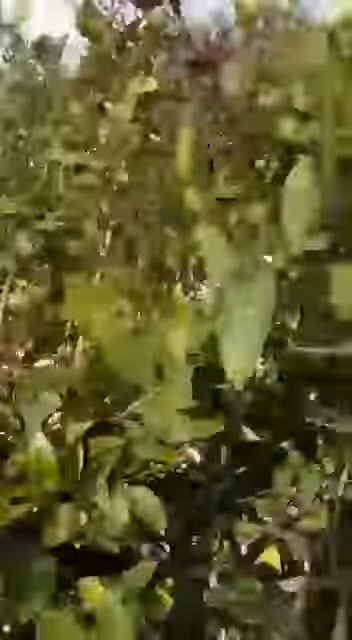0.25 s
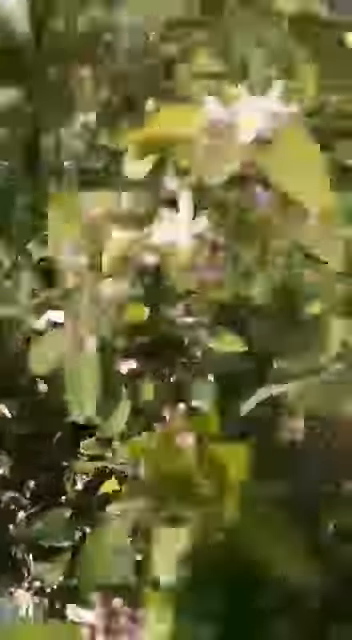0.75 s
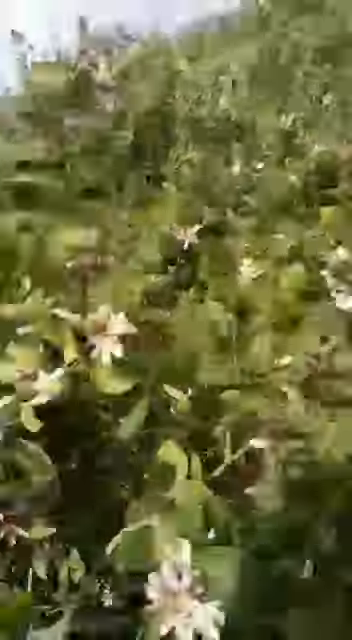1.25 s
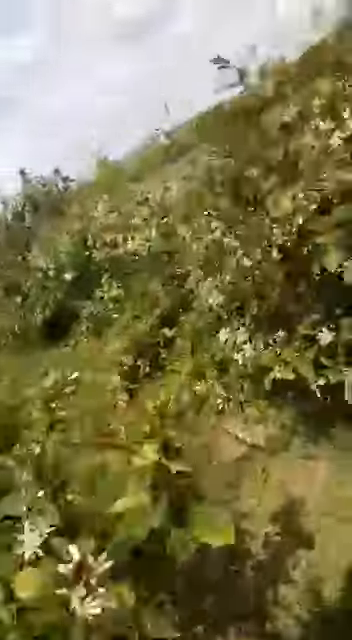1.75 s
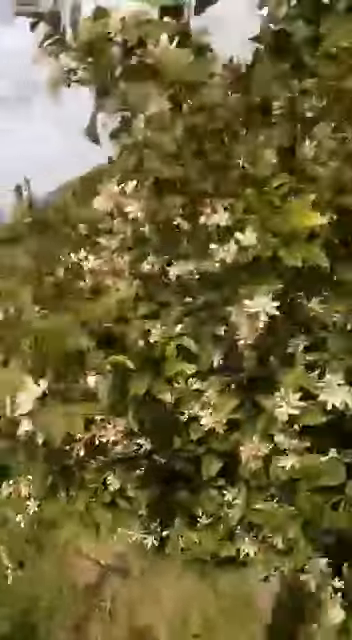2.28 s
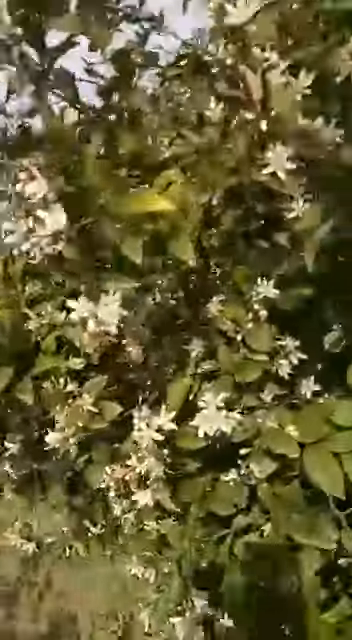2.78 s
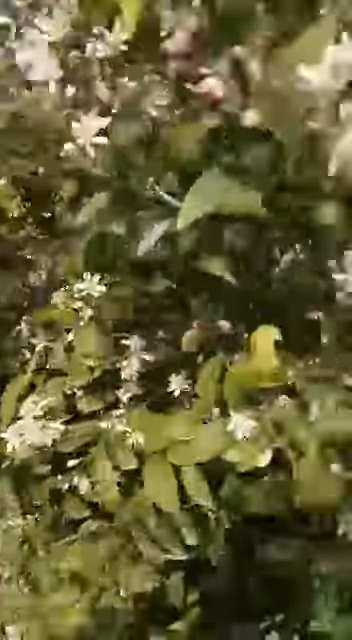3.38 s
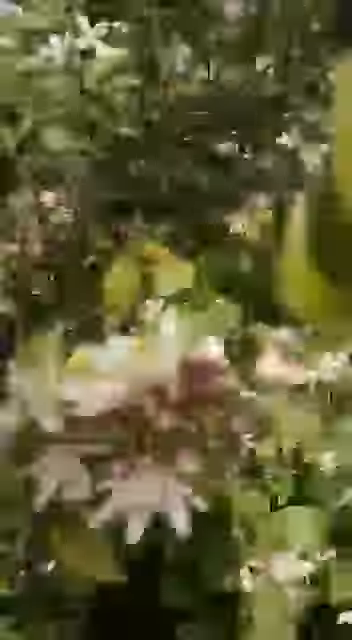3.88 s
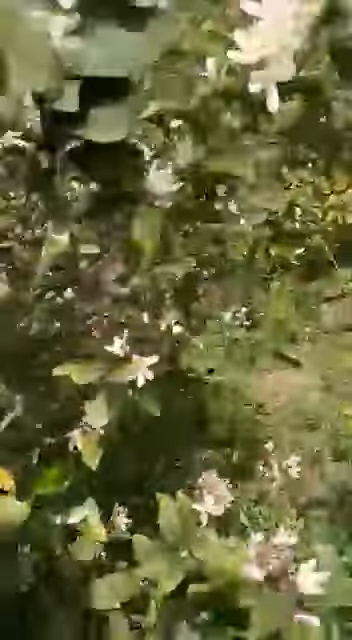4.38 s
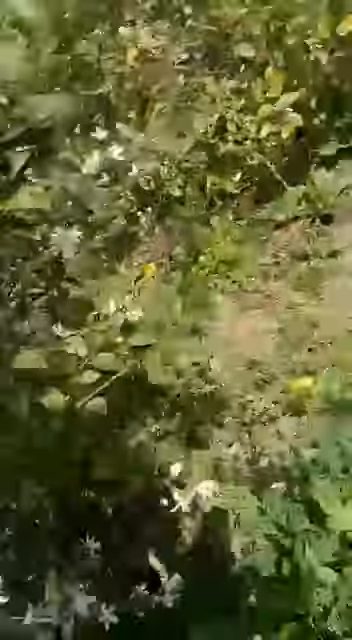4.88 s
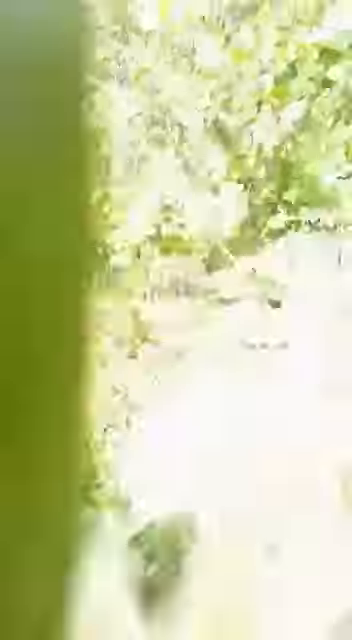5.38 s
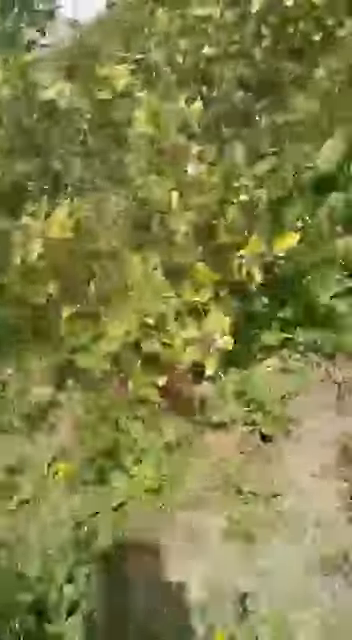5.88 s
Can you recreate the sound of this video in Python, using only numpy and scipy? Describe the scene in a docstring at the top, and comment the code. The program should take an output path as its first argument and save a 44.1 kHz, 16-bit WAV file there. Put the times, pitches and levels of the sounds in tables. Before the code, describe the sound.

Bees buzz faintly in an orchard as leaves rustle softly, until a leafy branch scrapes and knocks loudly against the microphone.

```python
"""A phone is carried through a blossoming orchard. From the start leaves crackle and swish and a swarm
hums with many wing beats, single bees swelling out of it. Wind bumps the microphone ports, one bee
buzzes close by around 1 s, then a far bird chirps. Twigs tick as the walker pushes on; near 2.3 s comes
a thin chirp, probably a bird. At 5 s, the loudest moment, a leafy branch drags across the right port,
sticking and slipping so that the case knocks and rumbles, and lets go with a few scuffs."""
import sys
import numpy as np
from scipy import signal
from scipy.fft import rfft, irfft
from scipy.io import wavfile
from scipy.ndimage import uniform_filter1d

SR = 44100
rng = np.random.default_rng(int(sys.argv[2]) if len(sys.argv) > 2 else 0)


def waveform_to_disk(signal):
    """Save audio, clipped to [-1, 1], as 16-bit WAV at the path in sys.argv[1]."""
    frames = np.transpose(np.atleast_2d(signal))
    scaled = np.clip(frames, -1, 1) * 32767
    samples = np.round(scaled).astype(np.int16)
    wavfile.write(sys.argv[1], SR, samples)


N = 270774
PORT_LAG = 17  # samples between the two ports; every pan is left minus right

# Hard hits of the branch: (time [s], level [dB], pitch [Hz], crack [dB])
SLIPS = [(5.0687, -7, 3160, -9), (5.0703, -15.5, 1170, 3), (5.0778, 1.5, 3630, -25), (5.0813, 1, 2550, -33),
         (5.122, -26.5, 680, -20), (5.1515, -8, 2830, -11), (5.1578, -26, 1210, -22), (5.276, -20, 520, -2),
         (5.2923, -9, 660, -17), (5.299, -11, 990, -11), (5.3145, -3.5, 1480, -24), (5.3202, -11, 664, -26),
         (5.3265, -11, 1670, -9), (5.3435, -6.5, 2170, -3), (5.346, -9, 1200, -28),
         (5.3657, -20, 1090, -19), (5.3722, -8, 746, -32), (5.393, -11.5, 1290, -22),
         (5.406, -13.5, 705, -22), (5.4091, -11.5, 1250, 4), (5.4473, -2.5, 2450, -30),
         (5.477, -1.5, 1460, -45), (5.491, -19, 500, -32), (5.5032, -19, 726, -30),
         (5.5302, -13, 1000, -22), (5.56, -24, 3300, -10), (5.565, -15, 1350, -10), (5.46, -28, 900, -20),
         (5.597, -23, 2670, -11), (5.603, -21, 2290, -20)]
def slips(lets_go_s=5.58):
    """Each slip of the branch knocks and rings the case, hard right until the branch lets go."""
    hits = [(s, db, hz, crack_db, -21 if s < lets_go_s else -3.5) for s, db, hz, crack_db in SLIPS]
    push = snaps(hits, turns=0.24, crack_hz=4540, rise_s=0.00075, fade_s=0.011, grit_db=-34, ring_s=8e-5)
    knock = cut(push, 110, "high", order=2)  # the deepest part of the push leaks away
    return undb(-1.5) * knock + undb(-4.5) * case(knock)


# Friction faders at the nearer port: (time [s], rumble [dB], scratch [dB], crisp top [dB])
DRAG = [(5.0, -69, -66, -66), (5.06, -76, -84, -80), (5.085, -25.5, -44, -70), (5.1, -59, -47, -79),
        (5.135, -50, -41, -60), (5.157, -33, -31, -66), (5.18, -27, -37, -50), (5.195, -37.5, -30, -36),
        (5.21, -53, -42.5, -52), (5.235, -51, -43.5, -58), (5.265, -36, -34.5, -58), (5.28, -35, -31, -74),
        (5.305, -32, -35.5, -71), (5.328, -20.5, -22.5, -41), (5.36, -27.5, -33, -49),
        (5.385, -36, -37.5, -47), (5.41, -30, -39, -42), (5.425, -44, -40.5, -47), (5.44, -44, -38, -59),
        (5.465, -47, -54, -68), (5.485, -35, -44, -75), (5.52, -36.5, -39, -49), (5.545, -32, -37.5, -41),
        (5.57, -42, -40.5, -61), (5.585, -51, -53.5, -50), (5.61, -49, -45.5, -49), (5.68, -57, -58, -55),
        (5.8, -64.5, -66, -60), (6.0, -47, -63, -90)]
# Travel of the branch: (time [s], pan [dB])
DRAG_PAN = [(5.05, 9), (5.09, -13.5), (5.42, -13.5), (5.55, -2), (5.72, 4.5), (6.0, 3)]
# EQ of the scratch: (frequency [Hz], gain [dB])
SCRATCH = [(530, -6), (900, -5), (1500, -0.5), (1740, -4.5), (2030, -2), (3430, -6), (6460, -7),
           (13600, -32), (15000, -13), (16500, -58)]
def drag():
    """Leaves stick and slip on the port: dense jolts scratch it and rumble the case."""
    rumble_db, scratch_db, crisp_db = curves(DRAG)
    pan_db, = curves(DRAG_PAN)

    def rub():
        rumble = unit(case(crackle(340, spread_db=3.5, tail_s=0.0047, hiss=0.3)))
        scratch = colour(crackle(1500, spread_db=2.5, tail_s=0.0006, hiss=0.4), SCRATCH)
        body, top = halves(scratch, 5570)
        flicker = undb(1.8 * walk(70))
        return flicker * (undb(rumble_db) * rumble + undb(scratch_db) * body + undb(crisp_db) * top)
    pair = ports(rub(), pan_db, lag=-PORT_LAG, apart=rub(), alike=0.041)
    return pair * undb(-abs(pan_db) / 2) * gate(DRAG, 0.053)


# Body resonances of the phone: (frequency [Hz], width [Hz], gain [dB])
CASE = [(433, 177, 9.5), (623, 68, 6), (946, 120, 1), (220, 170, -1.5)]
def case(x):
    """The case rings briefly when knocked or rubbed."""
    return resonate(x, CASE)


# Tail of the drag: (time [s], level [dB], pitch [Hz], crack [dB], pan [dB])
SCUFFS = [(5.643, -25.5, 2610, 5, 10), (5.7, -28.5, 2100, -2, 12), (5.73, -25.5, 2950, 4.5, 14),
          (5.749, -30, 2600, 0, 12), (5.91, -31.5, 3420, -8, 7)]
def scuffs():
    """The last leaves brush off the phone in short, gritty strokes."""
    return snaps(SCUFFS, turns=0.056, crack_hz=5460, rise_s=0.0095, fade_s=0.062, grit_db=-13)


# Soft knocks: (time [s], level [dB], pitch [Hz], crack [dB], pan [dB])
TAPS = [(0.6101, -37.5, 560, -22, 2.5), (3.7515, -48.5, 402, -30, 0), (4.3525, -31.5, 628, -25, -0.5),
        (4.856, -44, 476, -10, -1), (4.8637, -36, 524, -6, 3), (5.022, -28.5, 674, 4.5, 4.5)]
def taps():
    """Light touches on the case give short midrange knocks."""
    return snaps(TAPS, turns=0.51, crack_hz=6000, rise_s=0.00071, fade_s=0.029, grit_db=-10)


# Twig and leaf snaps: (time [s], level [dB], pitch [Hz], crack [dB], pan [dB])
TICKS = [(0.611, -44.5, 2070, -20, 12), (0.948, -47, 3200, -15, 14), (1.043, -44, 1490, -20, 9),
         (1.0496, -40, 6530, -21, 9), (1.8019, -48, 5870, 14, 22), (2.3252, -38.5, 1480, -18, 24),
         (2.4472, -46, 6490, 2, 11), (2.8488, -47, 4020, 0, 12), (2.8847, -46, 6050, 17, 12),
         (2.9777, -42.5, 6300, 8, 17), (3.068, -51, 7180, -3, 9), (3.3934, -39, 5000, 10, 11),
         (3.7248, -37.5, 5340, 9, 7), (3.7519, -28, 5070, 11, 9.5), (3.7621, -40.5, 5570, 18, -1),
         (4.2542, -44.5, 6200, 6, 0), (4.7651, -44.5, 6110, -6, 5), (4.8265, -44, 5300, -6, 12),
         (4.8438, -38, 5610, 3, -6), (4.9889, -42, 5500, 17.5, 3.5), (5.3935, -14, 8800, -6, -17),
         (5.42, -28, 7000, 4, -16), (5.5106, -18, 4300, -29, 23), (5.9018, -26.5, 1140, 2, 0.5),
         (5.9049, -31, 5500, 14, 29), (5.9165, -42, 1770, -8, -4)]
# Resonances of the ports: (frequency [Hz], width [Hz], gain [dB])
TICK_RINGS = [(3540, 940, 7), (6100, 1100, 7), (15600, 420, 10)]
def ticks():
    """Twigs and leaves snap, and each sharp click rings in the ports."""
    clicks = snaps(TICKS, turns=0.31, crack_hz=12700, rise_s=0.000089, fade_s=0.014, grit_db=-9.5)
    return clicks + resonate(clicks, TICK_RINGS)


# Foliage faders: (time [s], level [dB], crisp top over body [dB])
RUSTLE = [(0.0, -80.5, -3), (0.18, -79, -4), (0.26, -75.5, 3), (0.45, -69.5, 1.5), (0.6, -68.5, -2),
          (0.68, -73.5, -11), (0.8, -75, -4.5), (1.05, -69.5, -2.5), (1.23, -70.5, 5), (1.44, -77, -9.5),
          (1.56, -74, 2), (2.13, -64.5, -8), (2.3, -71, -5), (2.35, -56.5, -4), (2.42, -65, -2),
          (2.52, -64, 5), (2.64, -66.5, -0.5), (2.75, -62.5, 4), (2.8, -68.5, 1.5), (2.87, -66, -0.5),
          (2.93, -72, -0.5), (3.09, -75, 0), (3.38, -67.5, 2), (3.58, -80, -0.5), (3.76, -66, -1.5),
          (3.87, -75.5, -2), (4.42, -63.5, -3), (4.49, -72, -2.5), (4.84, -61, 1), (5.0, -72.5, 1),
          (5.8, -62, -2), (5.92, -63.5, -2.5), (6.14, -69, -11.5)]
# EQ of the leaves: (frequency [Hz], gain [dB])
LEAF = [(1180, -1.5), (2000, 6.5), (2400, -5.5), (3220, 3.5), (3880, 6.5), (4500, 2), (6470, 1),
        (8140, -15), (10500, -21.5), (13600, -33), (14900, -10), (15700, -20)]
# EQ of a dull swish, with a faint noisy hum at the bees' pitches: (frequency [Hz], gain [dB])
SWISH = [(71, -19), (120, -26.5), (235, -17), (343, -22), (470, -14), (604, -18.5), (820, -10.5), (1230, 1),
         (1390, -5), (1700, -5.5), (2400, -13), (3000, -13.5), (3900, -56), (6600, -120)]
def leaves():
    """Leaves crackle above a duller swish with a faint hum in it; the left port faces them."""
    db, crisp_db = curves(RUSTLE)
    swish_db = -65.5 + 0.33 * (db + 62.5)  # rides a third of the rustle's swells
    air_db = crisp_db - 1.5 + 3.6 * (np.minimum(db, -64) + 61.5)  # only the nearest leaves sparkle

    def rustle():
        grains = colour(crackle(600, spread_db=0, tail_s=0.0018, hiss=1), LEAF)
        body, treble = halves(grains, 8950)
        top, air = halves(treble, 12600)
        sway = undb(0.68 * walk(7.9))
        return sway * (body + undb(crisp_db + 1.5 * walk(30)) * top + undb(air_db + 2.3 * walk(30)) * air)

    def swish():
        grains = colour(crackle(300, spread_db=2.5, tail_s=0.0052, hiss=1.8), SWISH)
        low, upper = halves(grains, 630)
        mid, high = halves(upper, 1515)
        return (undb(3.03 * walk(7.7)) * low + undb(-1.5 + 2.9 * walk(22.03)) * mid
                + undb(-6 + 3.1 * walk(22.1)) * high)
    return (undb(db) * ports(rustle(), pan_db=9.5, apart=rustle(), alike=0.034)
            + undb(swish_db) * ports(swish(), pan_db=4.5, apart=swish(), alike=0.44))


# Fader of the swarm: (time [s], level [dB])
SWARM = [(0.0, -71.5), (0.12, -76), (0.28, -64), (0.54, -72), (0.7, -61.5), (1.02, -63.5), (1.52, -67),
         (2.0, -72), (2.4, -66), (2.9, -70), (3.3, -68), (3.42, -65.5), (3.65, -68), (3.9, -72.5),
         (4.2, -64), (4.45, -63), (4.6, -69), (5.0, -60), (5.3, -68), (6.14, -65)]
# Its pitch drift: (time [s], mean wing beat [Hz])
SWARM_HZ = [(0.0, 230.5), (1.4, 230.8), (2.9, 240), (3.65, 243.4), (3.85, 229), (4.7, 243.3), (5.0, 233)]
# Overtones of each bee: (harmonic [number], level [dB])
SWARM_WING = [(2, 0), (3, -11), (4, -14), (5, -9), (6, -13), (7, -14)]
def swarm(count, detune=0.07):
    """Many bees with evenly spread, wavering wing beats, each swelling at its own pan position."""
    db, = curves(SWARM)
    step = 8  # the hum is deep enough to work out once every few samples
    mean_hz = curves(SWARM_HZ)[0][::step]
    hum = 0
    for place in np.linspace(-1, 1, count):
        hz = mean_hz * (1 + detune * place + .03 * walk(6, step) + .02 * walk(35, step))
        swell = undb(4.5 * walk(10, step) + 4.5 * walk(25, step))
        voice = harmonics(step * hz, [*SWARM_WING, (1, -7.5)]) * swell
        pan_db = 0.52 + 2.6 * rng.standard_normal()
        hum = hum + ports(voice, pan_db, lag=rng.integers(0, PORT_LAG // step + 1))
    hum = hum * undb(3 * walk(12, step))
    return unit(signal.resample_poly(hum, step, 1, axis=1)[:, :N]) * undb(db)


# Close fly-by: (time [s], wing beat [Hz], level [dB], buzz over level [dB])
BEE = [(0.8, 221, -77.5, 10), (0.91, 217.2, -70, 2.5), (0.99, 211.3, -77.5, 10), (1.085, 223, -70.5, 9.5),
       (1.15, 222, -65, 2), (1.2, 215.7, -62, -4.5), (1.262, 210.6, -58, -9.5), (1.31, 223.7, -61.5, -28),
       (1.35, 236, -67, -36), (1.39, 229.2, -66, -27), (1.446, 214, -66, -16), (1.46, 222.4, -86, -2)]
# Its timbre: (harmonic [number], level [dB])
BEE_WING = [(1, 4), (2, -1), (3, -15), (4, -10.5), (5, -2.5), (6, -6.5), (7, -15), (8, -12.5)]
def bee():
    """One bee near the left port: its harmonics flutter, and a sharp flick each beat adds a buzz."""
    hz, db, buzz_db = curves(BEE)
    hz = hz * (1 + .005 * walk(35))
    beats = np.diff(np.floor(np.cumsum(hz) / SR), prepend=0)
    flicks = beats * undb(2 * rng.standard_normal(N))
    buzz = focus(flicks, 3900, 1400)
    tone = 0
    for k, harmonic_db in BEE_WING:
        flutter = undb((1.5 + .1 * k) * walk(40))
        tone = tone + flutter * harmonics(hz * (1 + .002 * walk(60)), [(k, harmonic_db)])
    voice = (np.sqrt(2) * tone + undb(buzz_db) * buzz) * undb(db) * gate(BEE, 0.072)
    return ports(voice, pan_db=6.3, alike=0.46)


# Brief bee passes: (time [s], wing beat [Hz], level [dB], length [s])
PASSERS = [(0.633, 225, -71, 0.081), (2.298, 222, -70, 0.18), (2.727, 245, -72.5, 0.18),
           (3.402, 240, -68, 0.1), (3.813, 239.7, -69.5, 0.088), (4.022, 232, -70.5, 0.11),
           (4.416, 228, -62.5, 0.088), (4.733, 240, -67.5, 0.15)]
# Their timbre: (harmonic [number], level [dB])
PASSER_WING = [(1, 3), (2, -1)]
def passers():
    """Single bees come nearer, swell out of the swarm and fade, their deepest tone strongest."""
    t = np.arange(N) / SR
    waver = 1 + 0.023 * walk(12)
    hum = 0
    for s, hz, db, length_s in PASSERS:
        swell = np.exp(-2 * ((t - s) / (length_s / 2)) ** 2)
        hum = hum + undb(db) * swell * harmonics(hz * waver, PASSER_WING)
    return ports(np.sqrt(2) * hum * undb(2 * walk(40)), pan_db=2.5)


# Low accents: (time [s], level [dB], pitch [Hz], pan [dB])
BUMPS = [(0.592, -40.5, 81.4, 27), (0.656, -40.5, 109, 22), (0.713, -32.5, 130, 25)]
def bumps():
    """Air and grip push on the left port: dull bumps with no crack."""
    hits = [(s, db, hz, -np.inf, pan_db) for s, db, hz, pan_db in BUMPS]
    return snaps(hits, turns=0.74, crack_hz=400, rise_s=.002, fade_s=.03, grit_db=-29)


# Fader of air and grip on the ports: (time [s], level [dB])
WIND = [(0.0, -76.5), (0.42, -66.5), (0.5, -70), (0.66, -52.5), (0.76, -57), (0.86, -57.5), (1.18, -75),
        (1.79, -68.5), (2.14, -83), (2.36, -66), (2.45, -75.5), (3.59, -76), (4.19, -69), (4.29, -59),
        (4.41, -66.5), (4.94, -61.5), (5.03, -73), (6.14, -67.5)]
# EQ of the buffeting: (frequency [Hz], gain [dB])
WIND_COLOUR = [(12, -43), (20, 1), (32, -10), (64, 8), (124, 0.5), (193, -3.5), (231, -3.5), (260, -18),
               (340, -41), (570, -120)]
# Low end of the branch pressing on the case: (time [s], level [dB])
THUDS = [(5.04, -78), (5.07, -59), (5.16, -59), (5.23, -70), (5.32, -36), (5.45, -49), (5.51, -38),
         (5.62, -48.5), (5.74, -50), (5.82, -65)]
def wind():
    """Low lumps of air pressure; while the branch rubs, tighter thuds join them."""
    db, = curves(WIND)
    lumps = [unit(colour(rng.standard_normal(N), WIND_COLOUR) * undb(1.5 * walk(32))) for _ in range(2)]
    thuds = [unit(cut(x, 98, "high")) for x in lumps]
    pressing = undb(curves(THUDS)[0]) * gate(THUDS, 0.018)
    gust_pan_db = .5 * (db + 70) + 3.8 * walk(9.5)  # stronger lumps come from the left
    thud_pan_db = 0.73 * curves(DRAG_PAN)[0]
    return (undb(db) * ports(lumps[0], gust_pan_db, lag=0, apart=lumps[1], alike=0.84)
            + pressing * ports(thuds[0], thud_pan_db, lag=0, apart=thuds[1], alike=0.76))


# High pips: (time [s], level [dB], pitch [Hz], crack [dB], pan [dB])
PIPS = [(1.8845, -43, 4000, -26, 24), (2.3148, -44, 4450, -24, 15), (2.3215, -43, 4330, -22, 6.5),
        (2.3275, -45, 4830, -22, 6), (2.3315, -38.5, 4770, -23, 14)]
def pips():
    """Short high-pitched pips; near 2.3 s they run into a thin rising chirp, probably a bird."""
    return snaps(PIPS, turns=4, crack_hz=9000, rise_s=0.0011, fade_s=0.035, grit_db=-23)


# The bird's lead-in note: (time [s], pitch [Hz], level [dB])
BIRD_NOTE = [(1.575, 2590, -88), (1.585, 2590, -73), (1.605, 2570, -73), (1.615, 2570, -88)]
# Its upward chirp: (time [s], pitch [Hz], level [dB])
BIRD_CHIRP = [(1.608, 3900, -85), (1.62, 4050, -69), (1.66, 5100, -70), (1.672, 5400, -85)]
def bird():
    """A far bird: a soft note, then a thin rising whistle that wavers through the leaves."""
    call = 0
    for note in (BIRD_NOTE, BIRD_CHIRP):
        hz, db = curves(note)
        call = call + harmonics(hz, [(1, 0)]) * undb(db) * gate(note, .004)
    return ports(call * undb(3 * walk(150)), pan_db=10)


def port_hiss():
    """A narrow steady hiss at the ports' resonance, unrelated left and right."""
    return undb(-86) * focus(rng.standard_normal((2, N)), hz=15100, width_hz=900)


def snaps(table, turns, crack_hz, rise_s, fade_s, grit_db, ring_s=0):
    """Stereo hits: a damped swing at each pitch, grit of the same colour and a bright crack on top."""
    length = 4096
    out = np.zeros((2, N + length))
    t = np.arange(length) / SR
    noise = rng.standard_normal((len(table), 2, 2, length))
    envelope = np.minimum(t / rise_s, 1) * np.exp(-np.maximum(t - rise_s, 0) * np.log(1000) / fade_s)
    for (s, db, hz, crack_db, pan_db), (grit, crack) in zip(table, noise):
        age = t / (turns / hz + ring_s)  # the swing's envelope peaks at age 1
        texture = envelope * (undb(grit_db) * unit(band(grit, hz, 0.53 * hz))
                              + undb(crack_db - 20.5) * focus(crack, crack_hz, crack_hz))
        for side, lead_db in enumerate((pan_db, -pan_db)):
            swing_hz = .8 * hz if lead_db < -8 else hz  # duller through the case at the far port
            swing = -np.sin(2 * np.pi * swing_hz * t) * age * np.exp(1 - age)
            start = int(s * SR) + PORT_LAG * (lead_db < 0)  # the far port hears it later and softer
            out[side, start:start + length] += undb(db + min(lead_db, 0)) * (swing + texture[side])
    return out[:, :N]


def crackle(rate, spread_db, tail_s, hiss):
    """Tiny noise bursts, rate a second and uneven by spread_db, over a share of even hiss."""
    cracks = (rng.random(N) < rate / SR) * undb(spread_db * np.minimum(rng.exponential(size=N), 4))
    tails = signal.lfilter([1], [1, -np.exp(-1 / (tail_s * SR))], cracks)
    bursts = unit(tails * rng.standard_normal(N))
    return unit(bursts + hiss * rng.standard_normal(N))


def harmonics(hz, levels):
    """Sines at multiples of a moving pitch, each with a random phase."""
    phase = 2 * np.pi * np.cumsum(hz) / SR
    return sum(undb(db) * np.sin(k * phase + 2 * np.pi * rng.random()) for k, db in levels)


def ports(sound, pan_db, lag=PORT_LAG, apart=0, alike=1):
    """Stereo pair: the right port gets a share (alike) of the sound, shifted by lag, plus its own."""
    right = alike * np.roll(sound, lag) + np.sqrt(1 - alike ** 2) * apart
    return np.array([sound, right]) * undb(np.array([pan_db, -pan_db]) / 2).reshape(2, -1)


def walk(rate, step=1):
    """Smooth random drift, rate new targets a second, one value every step samples; spread near 1."""
    held = np.repeat(rng.standard_normal(int(N / SR * rate) + 2), 8)
    smooth = uniform_filter1d(uniform_filter1d(held, size=8), size=8)
    return 1.3 * np.interp(np.arange(0, N, step) * 8 * rate / SR, np.arange(len(held)), smooth)


def curves(table):
    """Columns of a timed table, one value per sample."""
    s, *columns = np.transpose(table)
    return [np.interp(np.arange(N) / SR, s, c) for c in columns]


def gate(table, edge_s):
    """1 while a table lasts, fading over edge_s at both ends."""
    t = np.arange(N) / SR
    return np.clip(np.minimum(t - table[0][0], table[-1][0] - t) / edge_s, 0, 1)


def colour(x, points):
    """Minimum-phase EQ through the given points."""
    hz, db = np.transpose(points)
    bins_hz = np.maximum(np.arange(2049) * SR / 4096, 1)
    gain_db = np.interp(np.log(bins_hz), np.log(hz), db, left=-60, right=-60)
    cepstrum = irfft(gain_db * np.log(10) / 20)
    cepstrum[1:2048] *= 2  # folding it forward makes the filter causal
    cepstrum[2049:] = 0
    return signal.fftconvolve(x, irfft(np.exp(rfft(cepstrum))))[:N]


def band(x, hz, width_hz):
    """Resonance with gain 1 at its centre."""
    return signal.lfilter(*signal.iirpeak(hz, hz / width_hz, SR), x)


def focus(x, hz, width_hz):
    """The same resonance twice over, at rms 1."""
    return unit(band(band(x, hz, width_hz), hz, width_hz))


def resonate(x, modes):
    """A bank of parallel resonances."""
    return sum(undb(db) * band(x, hz, width_hz) for hz, width_hz, db in modes)


def cut(x, hz, kind, order=4):
    """Low-pass or high-pass."""
    return signal.sosfilt(signal.butter(order, hz, kind, fs=SR, output="sos"), x)


def halves(x, split_hz):
    """The parts below and above split_hz, each at rms 1."""
    return [unit(cut(x, split_hz, kind)) for kind in ("low", "high")]


def undb(db):
    """Decibels to gain."""
    return 10 ** (np.asarray(db) / 20)


def unit(x):
    """Scale to rms 1."""
    return x / np.sqrt(np.mean(x ** 2))


def scene():
    """The stereo mix: sustained layers, then the hits."""
    sustained = leaves() + wind() + swarm(count=11) + passers() + bee() + bird() + drag() + port_hiss()
    return sustained + slips() + ticks() + bumps() + taps() + pips() + scuffs()


def record(dry, ceiling=0.9, top_hz=16600):
    """The phone rounds the loudest peaks and cuts the top steeply."""
    rounded = dry / (1 + np.abs(dry / ceiling) ** 4) ** .25
    return signal.sosfilt(signal.ellip(10, .2, 80, top_hz, fs=SR, output="sos"), rounded)


dry = scene()
out = record(dry)
waveform_to_disk(out)
```